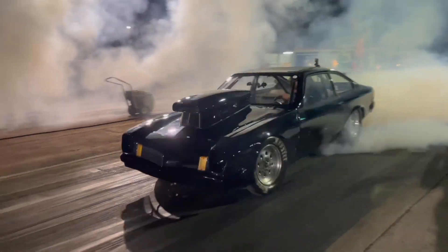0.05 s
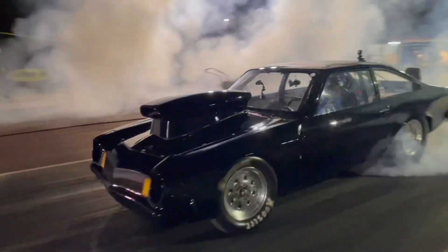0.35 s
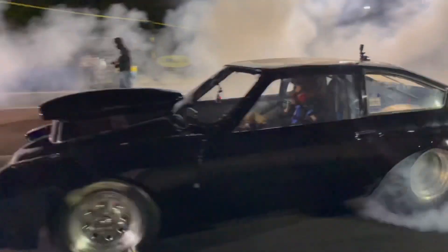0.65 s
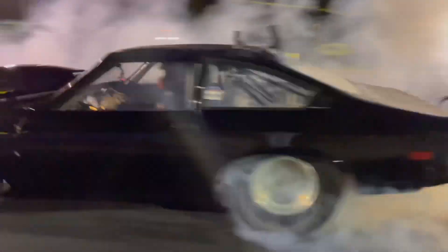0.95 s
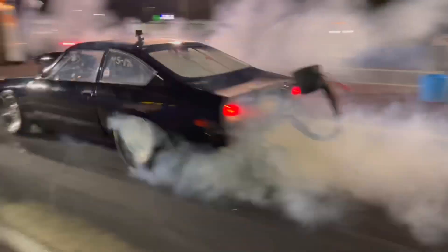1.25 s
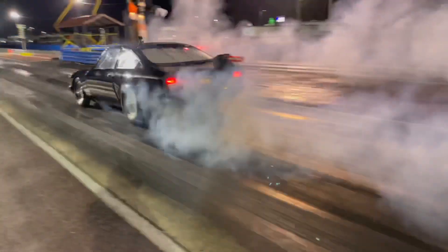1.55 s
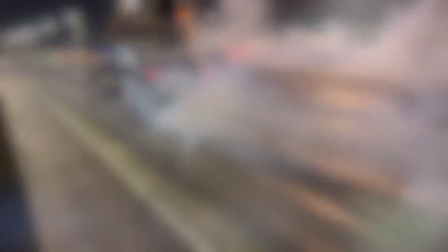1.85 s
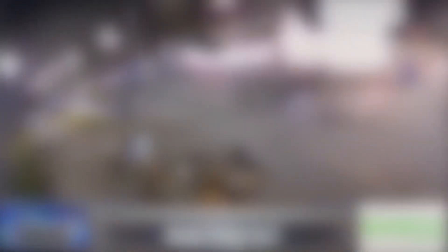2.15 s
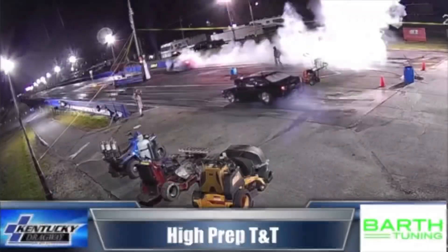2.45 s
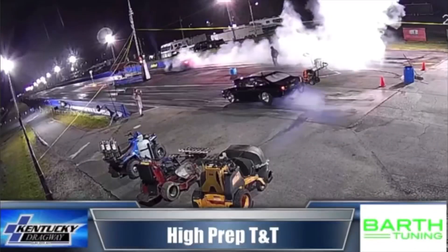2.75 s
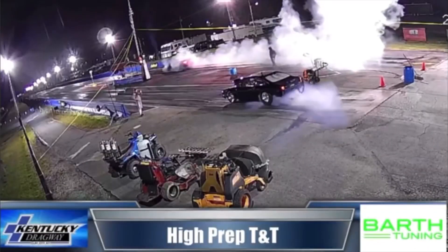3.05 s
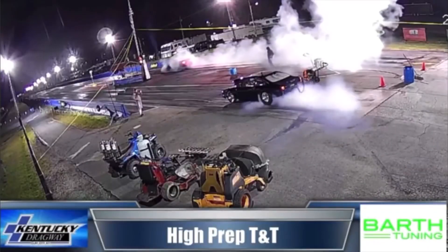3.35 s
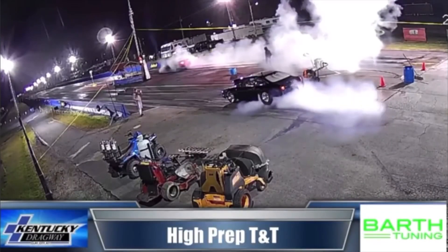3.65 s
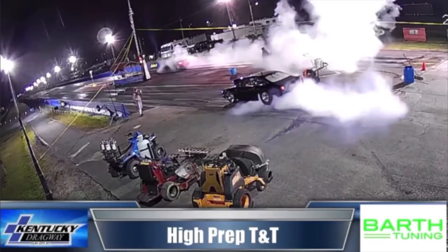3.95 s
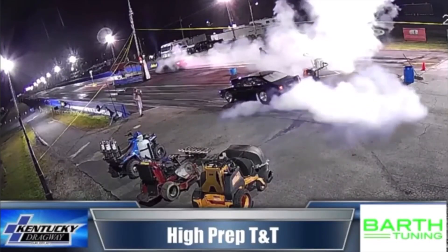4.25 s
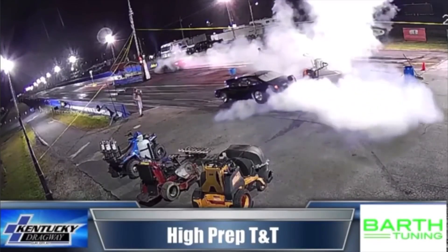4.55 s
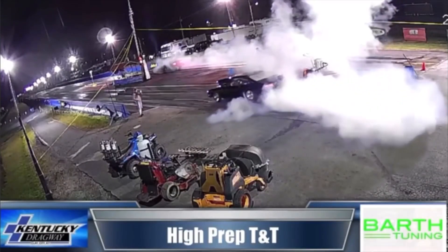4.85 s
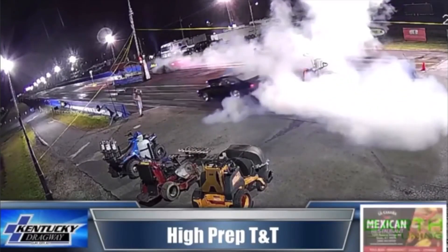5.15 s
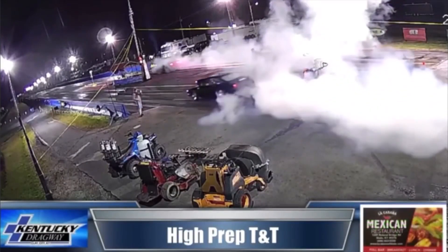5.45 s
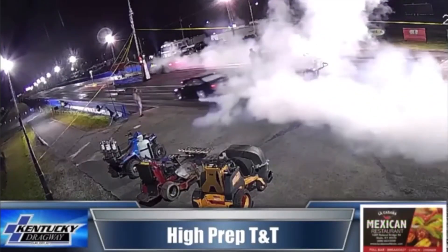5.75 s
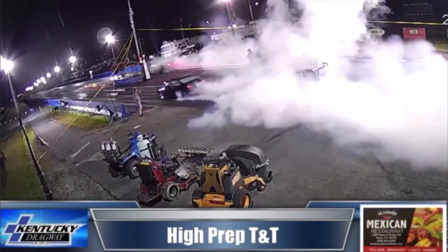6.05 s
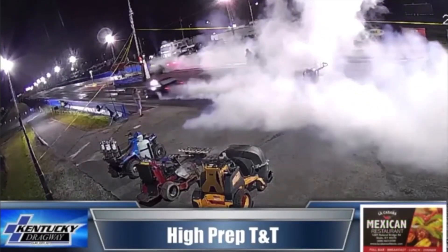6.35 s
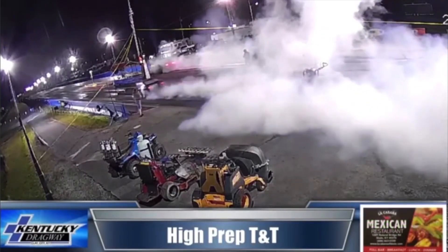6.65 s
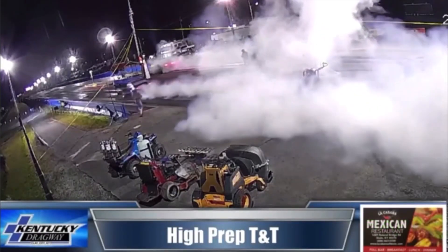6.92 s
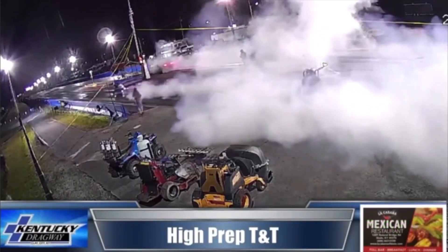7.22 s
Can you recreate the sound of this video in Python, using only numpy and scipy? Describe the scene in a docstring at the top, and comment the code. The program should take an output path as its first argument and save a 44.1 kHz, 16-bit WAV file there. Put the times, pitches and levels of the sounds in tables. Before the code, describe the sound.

A race car booms past close by with sizzling tyres, then a faraway engine holds high revs in a burnout before falling to idle.

```python
"""Trackside at a drag strip, a stereo microphone 1.6 m from the pipes: a V8 slides past in a burnout,
its firings booming and barking, tyres sizzling, exhaust gusts buffeting the microphone. The driver lifts
and the car burbles off to the left, popping unburnt fuel and flicking grit. Around two seconds in, the
sound fades over to a distant mono microphone above the strip. There a second burnout is held for four
seconds, until the throttle shuts and the engine drops to a lumpy, receding idle."""
import sys
import numpy as np
from scipy import signal
from scipy.fft import rfft, irfft, next_fast_len
from scipy.io import wavfile
from scipy.ndimage import uniform_filter1d, map_coordinates

SR = 44100
rng = np.random.default_rng(int(sys.argv[2]) if len(sys.argv) > 2 else 0)


def generate_wav(signal):
    """Clip the signal to [-1, 1] and save it as 16-bit WAV at the path in sys.argv[1]."""
    frames = np.transpose(np.atleast_2d(signal))
    scaled = np.clip(frames, -1, 1) * 32767
    pcm = np.round(scaled).astype(np.int16)
    wavfile.write(sys.argv[1], SR, pcm)


N = 321046
T = np.arange(N) / SR

# the eight firings as heard from the nearer bank of pipes, in firing order: level_db
FIRING_DB = [0.5, -9.5, -3.5, -2, -5.5, -2, -5.5, -7.5]
# spectrum of a sharp tick, for grit and after-fires: frequency_hz, level_db
TICK_SPECTRUM = [(1500, -9), (4900, -0.5), (6000, -6), (8200, -3), (9700, -12), (13500, 0.5)]

PIPE_HZ = 233.8  # the exhaust's main resonance
NEAR_LIFT_S, FAR_LIFT_S = .878, 5.925  # the driver lifts off the throttle
CAR_M_S, PIPES_S, PIPES_M = 5, .51, 1.6  # close car's speed; when its pipes are abreast, and how far off


def undb(db):
    """Decibels to gain."""
    return np.exp(np.asarray(db) * np.log(10) / 20)


def curves(table):
    """Each column of a table of rows (time_s, ..) at every sample."""
    times, *columns = np.transpose(table)
    return [np.interp(T, times, column) for column in columns]


def ramp(start_s, end_s):
    """Goes from 0 to 1 between two times."""
    return np.clip((T - start_s) / (end_s - start_s), 0, 1)


def fade(start_s, db_per_s):
    """Gain that falls evenly in dB from a given time."""
    return undb(-db_per_s * np.maximum(T - start_s, 0))


def swells(events, attack_s, decay_s):
    """Gain of events (start_s, level_db) that each rise quickly and die away."""
    return sum(undb(db) * ramp(s, s + attack_s) * np.exp(-np.maximum(T - s - attack_s, 0) / decay_s)
               for s, db in events)


def steady(x, size=4000):
    """Holds the short-term rms of the channel mean at 1."""
    power = uniform_filter1d(np.atleast_2d(x).mean(axis=0) ** 2, size=size)
    return x / np.sqrt(np.abs(power) + 1e-12)


def roughen(tones, noise, share):
    """Levels tones and noise, then mixes them with the noise taking a share 0-1 of the power."""
    return np.sqrt(1 - share) * steady(tones) + np.sqrt(share) * steady(noise)


def walk(rate_hz):
    """Random wander with a spread near 1."""
    knots = rng.standard_normal(int(rate_hz * N / SR) + 2)
    return np.interp(T * rate_hz, np.arange(len(knots)), knots) * np.sqrt(3 / 2)


def air(likeness):
    """Two channels of noise, alike by a share 0-1."""
    common = np.sqrt(likeness) * rng.standard_normal(N)
    return common + np.sqrt(1 - likeness) * rng.standard_normal((2, N))


def colour(x, points, size=4096):
    """Minimum-phase filter through (frequency_hz, level_db) points, falling steeply beyond them."""
    hz, db = np.transpose(points)
    log_hz = np.log(np.maximum(np.fft.rfftfreq(size, 1 / SR), 1))
    outside = np.maximum(np.log(hz[0]) - log_hz, 0) + np.maximum(log_hz - np.log(hz[-1]), 0)
    response_db = np.interp(log_hz, np.log(hz), db) - 27.7 * np.minimum(outside, 2)
    cepstrum = irfft(np.log(undb(response_db)))
    cepstrum[1:size // 2] *= 2
    cepstrum[size // 2:] = 0
    impulse = irfft(np.exp(rfft(cepstrum)))
    return signal.oaconvolve(np.atleast_2d(x), impulse[None], axes=1)[:, :N]


def ring(x, hz, width_hz):
    """One resonance, gain 1 at its centre."""
    return signal.lfilter(*signal.iirpeak(hz, hz / width_hz, fs=SR), x)


def passing(abreast_s, metres):
    """Inverse-distance gain of a part of the car, 1 when abreast of the microphone."""
    return metres / np.hypot(CAR_M_S * (T - abreast_s), metres)


def bearing():
    """Sine of the angle from the microphone to the pipes: -1 approaching, +1 leaving."""
    return CAR_M_S * (T - PIPES_S) / PIPES_M * passing(PIPES_S, PIPES_M)


def ports(x, lag_s):
    """Sound reaches the microphone's two ports apart in time, by the bearing of the car."""
    delays_s = np.array([[-1], [1]]) * lag_s * bearing() / 2
    return np.array([map_coordinates(channel, [(T - delay_s) * SR], mode="nearest")
                     for channel, delay_s in zip(x, delays_s)])


def shade(x):
    """The microphone's body shades the right port, more so once the car has gone left."""
    # balance facing the car, then with the car off to the left: frequency_hz, left_minus_right_db
    facing = [(100, 1), (300, -1), (600, -2), (1300, 3.5), (2500, -1.5), (4500, 3), (20000, -1)]
    gone_left = [(250, 1), (600, 4), (1300, 12.5), (2500, -4), (4500, 9), (20000, -4.5)]
    size = next_fast_len(N)
    log_hz = np.log(np.maximum(np.fft.rfftfreq(size, 1 / SR), 1))
    turned, shaded = ramp(.88, .98), 0
    for balance, share in ((facing, 1 - turned), (gone_left, turned)):
        hz, db = np.transpose(balance)
        tilt_db = np.interp(log_hz, np.log(hz), db)
        gains = undb(np.array([tilt_db, -tilt_db]) / 2)
        shaded += share * irfft(rfft(x, size) * gains, size)[:, :N]
    return shaded


def closing(lift_s):
    """The throttle, from 0 open to 1 shut in 42 ms."""
    return ramp(lift_s, lift_s + .042)


def overrun(lift_s, drop_db, db_per_s, coast_s=.22):
    """Gain after a lift: a step down as the throttle shuts, a short coast, then a fade."""
    return undb(drop_db * closing(lift_s)) * fade(lift_s + coast_s, db_per_s)


def revs(held_hz, lift_s, idle_hz=17, sag_hz_per_s=82):
    """Engine cycles per second: held until the driver lifts, then sinking evenly to idle."""
    return np.maximum(idle_hz, held_hz - sag_hz_per_s * np.maximum(T - lift_s, 0))


def crank(cycle_hz, flutter):
    """Engine cycles turned so far; the slipping tyres make the speed flutter."""
    return np.cumsum(cycle_hz * (1 + flutter * walk(30))) / SR


def firings(turns, scatter_db, jitter_s):
    """One pulse per firing, uneven in size and timing; unequal pipes give each cylinder its own delay."""
    count = len(FIRING_DB)
    k = np.arange(int(turns[-1] * count))
    late = rng.permutation(count) / count * .22  # share of the gap between firings
    chance = rng.standard_normal((len(k), 2))
    times_s = np.interp((k + late[k % count]) / count, turns, T) + jitter_s * chance[:, 0]
    size = undb(np.array(FIRING_DB)[k % count] + scatter_db * chance[:, 1])
    at = np.clip(times_s * SR, 0, N - 2)
    i = at.astype(int)  # each pulse is shared between two samples
    return np.bincount(i, size * (1 - at + i), N) + np.bincount(i + 1, size * (at - i), N)


def puffs(pulses, decay_s):
    """Each pulse opens a flow that dies away."""
    return signal.lfilter([1], [1, -np.exp(-1 / (decay_s * SR))], pulses)


def exhaust_lines(turns, views, turned, unrest, first_order, extra_db=None, extra_orders=0, apart=0):
    """Tones at multiples of the cycle rate, blended from view to view as the car turns its pipes."""
    mid, side, pattern = np.zeros(N), np.zeros(N), np.fft.fft(undb(FIRING_DB))
    orders = list(zip(*views)) + [[extra_db] * len(views)] * extra_orders
    for k, levels in enumerate(orders, first_order):
        # the firing order sets each phase; hot, moving air makes phase and level wander
        phase = np.angle(pattern[k % len(pattern)]) + unrest ** 2 * rng.standard_normal()
        drift = .5 * unrest * min(k / 10, 1) * walk(16)
        angle = 2 * np.pi * (k * turns % 1) + phase + drift
        waver_db = 2 * unrest * (walk(6) + walk(28))  # slow sway and quick flicker
        gain = undb(np.interp(turned, np.arange(len(views)), levels) + waver_db)
        mid += gain * np.sin(angle)
        if apart:  # short waves reach the two ports out of step
            side += gain * np.cos(angle) * apart * np.sqrt(k) * walk(5)
    return np.array([mid + side, mid - side]) if apart else mid


def strip():
    """Low rumble and hiss at the distant microphone above the strip."""
    # steady background: frequency_hz, level_db
    spectrum = [(25, 2), (85, -1.5), (380, -8), (2000, -20.5), (2680, -6.5), (3200, -19.5), (11300, -24),
                (12200, -47)]
    return steady(colour(rng.standard_normal(N), spectrum)) * undb(-66.5 + 1.1 * walk(4)) * ramp(1.7, 2.4)


def far_burnout():
    """From far off: low exhaust tones, a rasp in the microphone's resonance and crackle, then idle."""
    # engine speed with the throttle held: time_s, cycle_hz
    held_speed = [(2.0, 62), (2.19, 64.8), (2.41, 65.7), (3.25, 61.6), (3.48, 61.8), (4.14, 66),
                  (4.43, 64.9), (4.63, 62.3), (4.95, 61.1), (5.6, 60.7), (5.9, 61)]
    # loudness with the throttle held: time_s, exhaust_db, rasp_db
    held_levels = [(2.25, -47.5, -47), (3.44, -47, -45), (3.52, -45, -45.5), (4.6, -47, -45),
                   (4.92, -46.5, -47.5), (5.46, -44.5, -46.5), (5.88, -43.5, -43)]
    # exhaust tones from the front quarter, the flank and behind, orders 2-24: level_db
    quarter = [-19, -12.5, -11, -4.5, -15, -15, 0, -12, -10, -17, -4.5, -10, -26, 0, -5.5, -8, -2.5, -15,
               -20, -1.5, -6, -11, -8]
    flank = [-9, -12.5, -14, -2, -8, -10.5, 0.5, -14, -10, -4.5, -4.5, -9, -25, -2, -5.5, 1, -10, -8, -17,
             1, -1.5, -13, -11]
    behind = [-16.5, -25.5, -15.5, -9.5, -12, -13, -4, -11.5, -11.5, -21, -21, -3.5, -10, -31, -1.5, -21,
              -7, -16, -7.5, -0.5, 1, -1.5, -15]
    # rasping overtones from the same three sides, orders 36-46: level_db
    quarter_rasp = [-14, -6, -3, 1, -11, -4.5, -4, -2, -4, -8, -33]
    flank_rasp = [-6, 1, -3, -2, 0, -0.5, 1.5, -20, -6, -24, -12]
    behind_rasp = [-4.5, -9.5, -6, -11, -8, -6, 1.5, -2, -3, -12.5, -5]
    # turbulent exhaust, rasp and crackle at this distance: frequency_hz, level_db
    roar_spectrum = [(60, -19), (280, -8), (520, 0.5), (760, -0.5), (1050, 4), (1350, 5), (1600, -1.5),
                     (2100, -23.5)]
    rasp_spectrum = [(1200, -37.5), (1550, -15), (1780, -9), (2150, -6), (2420, 0.5), (2690, 5), (2950, -9),
                     (4000, -24)]
    crackle_spectrum = [(2500, -26), (3300, -3), (4500, 7), (6000, -6.5), (11000, -22)]
    # stronger burbles of the idle: start_s, exhaust_db, rasp_db
    idle_burbles = [(6.39, -63, -70), (6.615, -65.5, -70), (6.675, -64.5, -66), (6.895, -74, -60.5),
                    (7.035, -69, -66)]

    held_hz, = curves(held_speed)
    exhaust_db, rasp_db = curves(held_levels)
    turns = crank(revs(held_hz, FAR_LIFT_S), flutter=.001157)
    shut, idle = closing(FAR_LIFT_S), ramp(5.96, 6.7)
    # higher revs are rougher and the tones break up at the peak; a shut throttle is mostly turbulence
    rough = .06 + .014 * (held_hz - held_hz.min()) + .27 * np.exp(-((T - 4.25) / .07) ** 2)
    rough = np.clip(rough + (.8 - rough) * shut, 0, 1)
    pulses = firings(turns, scatter_db=2.5, jitter_s=.00002)
    flow = rng.standard_normal(N) * puffs(pulses, decay_s=.013)
    turned = ramp(3.5, 3.7) + ramp(4.46, 5.15)
    ragged = undb(1.2 * walk(90))  # no two engine cycles burn alike
    lines = ragged * exhaust_lines(turns, (quarter, flank, behind), turned, unrest=.9,
                                   first_order=2, extra_db=-10, extra_orders=11)
    exhaust = roughen(lines, colour(flow, roar_spectrum), rough)
    # with the throttle shut the falling orders sweep through the pipe resonance
    pipe_drive = steady(lines) + undb(-5) * steady(flow)
    exhaust += undb(-7) * (shut - idle) * steady(ring(ring(pipe_drive, PIPE_HZ, 149), PIPE_HZ, 151))
    exhaust += undb(-7.5) * idle * steady(ring(ring(pulses, 88, 68), 89, 70))  # single firings thump
    # the high orders waver most on their way through the air
    overtones = ragged * exhaust_lines(turns, (quarter_rasp, flank_rasp, behind_rasp), turned,
                                       unrest=1.1, first_order=36)
    rasp = roughen(ring(overtones, 2550, 600), colour(flow, rasp_spectrum), np.clip(rough + .22, 0, 1))

    # the idle lopes, burbles and recedes
    lope = idle * undb(2.4 * walk(16)) * fade(6.26, db_per_s=8)
    burp, buzz = (swells(np.array(idle_burbles)[:, [0, k]], attack_s=.016, decay_s=.038) for k in (1, 2))
    exhaust_gain = undb(exhaust_db) * overrun(FAR_LIFT_S, drop_db=-6.5, db_per_s=99.5)
    rasp_gain = undb(rasp_db) * overrun(FAR_LIFT_S, drop_db=-8.5, db_per_s=84.5)
    exhaust *= np.hypot(exhaust_gain, np.hypot(undb(-68) * lope, burp))
    rasp *= np.hypot(rasp_gain, np.hypot(undb(-66.5) * lope, buzz))
    # the crackle comes in surges and grows faster than the rasp as the engine works harder
    crackle_db = -61.5 + 2 * (rasp_db - rasp_db.max()) + walk(20)
    crackle = steady(colour(flow, crackle_spectrum)) * undb(crackle_db)
    crackle *= overrun(FAR_LIFT_S, drop_db=-9.5, db_per_s=54)
    return (exhaust + rasp + crackle) * ramp(1.765, 2.34)


def buffet():
    """The exhaust blast shakes the close microphone: a few gusts, then a dying wake."""
    # gusts that hit the microphone: start_s, level_db
    gusts = [(.225, -28.5), (.36, -23.5), (.51, -24), (.665, -33)]
    eddies = air(.33) * undb(2.8 * walk(25))
    blast = steady(colour(eddies, [(30, -24.5), (62, -2), (95, -1), (200, -12.5)]), size=2000)
    wake = undb(-46 + 10 * ramp(.21, .24)) * fade(.8, db_per_s=25)
    return blast * (wake + swells(gusts, attack_s=.008, decay_s=.033))


def grit():
    """Crumbs of rubber and stone tick with a bright ring; finer ones sprinkle on as the car leaves."""
    # larger pieces flung from the slicks: start_s, level_db
    hits = [(1.411, -43), (1.507, -44), (1.5809, -43.5), (1.7406, -45), (1.9007, -38.5), (2.056, -49)]
    crumbs_per_s, tick_ring_hz = 140, 4800
    crumbs = (rng.random(N) < crumbs_per_s / SR) * undb(2.4 * rng.standard_normal(N))
    crumbs *= ramp(1.65, 1.75) * fade(1.75, db_per_s=14)
    sprinkle = undb(-56) * puffs(crumbs, decay_s=.0048)
    contact = air(.21) * (swells(hits, attack_s=.001, decay_s=.006) + sprinkle)
    return colour(contact, TICK_SPECTRUM) + 1.1 * ring(contact, tick_ring_hz, 350)


def cracks():
    """Small after-fires at the pipe mouths: a short rush of gas with a hollow ring."""
    # after-fires: start_s, level_db
    after_fires = [(1.384, -41), (1.4671, -44), (1.6225, -40), (1.6963, -38), (1.829, -43), (1.8585, -42)]
    burst = air(.35) * swells(after_fires, attack_s=.001, decay_s=.0084)
    return 3 * ring(burst, hz=950, width_hz=380) + .65 * colour(burst, TICK_SPECTRUM)


def burble(turns):
    """Off throttle, ragged firings ring the pipe and thud; pops and a nudge of throttle lift them."""
    # gas leaving the pipes: frequency_hz, level_db
    gas_spectrum = [(200, -8.5), (480, 0), (1300, -13.5), (4600, -19), (15000, -39)]
    # unburnt fuel popping in the pipes: start_s, level_db
    fuel_pops = [(1.2, -32.5), (1.383, -38.5)]
    pulses = firings(turns, scatter_db=5, jitter_s=.00098)
    flow = air(.86) * puffs(pulses, decay_s=.0113)
    pipe = steady(ring(ring(flow, PIPE_HZ, 33), PIPE_HZ, 130), size=1500)
    thud = steady(colour(flow, [(35, -35), (58, 0), (85, 1), (130, -7.5), (180, -14.5)]), size=2500)
    gas = steady(colour(flow, gas_spectrum))
    nudge_s, peak_s = 1.573, 1.703  # a touch of throttle keeps the car rolling
    rolling, nudge = ramp(1.3, 1.39), ramp(nudge_s, peak_s) ** 2
    pops = swells(fuel_pops, attack_s=.0021, decay_s=.042)
    pipe *= undb(-52) * rolling + undb(-44) * nudge * fade(peak_s, db_per_s=50) + pops
    thud *= undb(-56.5) * rolling + undb(-46) * nudge * fade(peak_s, db_per_s=17)
    gas *= undb(-57) * rolling + undb(-47.5) * nudge * fade(peak_s, db_per_s=79) + undb(-6) * pops
    return pipe + thud + gas


def close_pass(turns, cycle_hz):
    """Open pipes boom and bark, gas and tyres sizzle; all swell in passing and sink after the lift."""
    # exhaust tones ahead of the car, at the pipes, at the rear wheel and past it, orders 2-24: level_db
    ahead = [-4, -1.5, -12, 0, -10, -25, -5, -9, -16, -6.5, -15, -6, -5.5, -9, -7.5, -22, -4, -5, -6.5, -8,
             -8.5, -15, -9.5]
    abreast = [-12, -4.5, -17, 0.5, -15.5, -14.5, -6.5, -10, -4.5, 0, -13, -6, -11.5, -16.5, -10.5, -12,
               -16, -7, -14.5, -9.5, -11, -15.5, -10]
    rear_wheel = [-16.5, -10.5, -14, 1.5, -11, -14.5, 3.5, -10.5, -8, -3.5, -8.5, -2, -4.5, -1, -10, -16,
                  -16.5, -11, -20.5, -11.5, -10.5, -15, -11]
    past = [-13.5, -11, -13.5, 1.5, -12, -30.5, -14, -20, -22, -6.5, -13.5, -10, -7, -10, -12.5, -23.5,
            -22.5, -11.5, -21, -11, -13, -14.5, -17]
    # turbulent exhaust from close by: frequency_hz, level_db
    roar_spectrum = [(50, -22.5), (130, -3.5), (240, -1.5), (380, -1), (620, -2), (1000, -4), (1300, -0.5),
                     (1750, -5), (2100, -18.5), (3600, -28.5)]
    # bright hiss and spray, with the peaks and notches the microphone and recorder add:
    # frequency_hz, level_db
    bright_hiss = [(1500, -13), (2300, 0), (3300, -1.5), (4800, -2), (5600, -9.5), (6600, 0), (7500, -11.5),
                   (8200, -9), (9800, -14), (13000, -7), (15500, -12)]
    bright_spray = [(1500, -5), (2300, -2), (3200, -4.5), (4900, 3), (5800, -5), (7300, -5), (8200, 0),
                    (9700, -12), (13500, -8), (15500, -11.5)]
    tyres_s, tyres_m = .64, 2.74  # when the rear tyres are abreast, and how far off

    shut = closing(NEAR_LIFT_S)
    pulses = firings(turns, scatter_db=2, jitter_s=.00008)
    turned = ramp(.26, .38) + ramp(.53, .6) + ramp(.66, .73)
    # the tones are steady ahead of the car and break up in its wake
    lines = exhaust_lines(turns, (ahead, abreast, rear_wheel, past), turned, first_order=2,
                          unrest=.55 + .6 * ramp(.3, .5), extra_db=-22, extra_orders=14, apart=.18)
    roar = colour(air(.55) * puffs(pulses, decay_s=.0016), roar_spectrum)
    lowpass = signal.butter(4, 400, fs=SR, output="sos")  # boom below 400 Hz, bark above
    low_lines, low_roar = signal.sosfiltfilt(lowpass, lines), signal.sosfiltfilt(lowpass, roar)

    # a few firings after the lift, the boom narrows to the pipe resonance
    spent = closing(NEAR_LIFT_S + .023)
    low_lines, low_roar = ((1 - spent) * x + spent * ring(x, PIPE_HZ, 59) for x in (low_lines, low_roar))
    # the falling fifth order swells in that resonance and stays clean until it has dropped through
    in_tune = np.exp(-((5 * cycle_hz - PIPE_HZ) / 24) ** 2)
    boom = roughen(low_lines, low_roar, np.clip(.062 + ramp(1.07, 1.095), 0, 1))
    # thrown backwards, the boom is stronger once the car is past; it dips as the rear wheel goes by
    dip_db = 4 * np.exp(-((T - tyres_s) / .14) ** 2)
    boom *= undb(-18.5 + 2 * bearing() + 10 * in_tune - dip_db)
    boom *= overrun(NEAR_LIFT_S, drop_db=-7, db_per_s=129)

    # the bark is more turbulent behind the car, and half turbulence with the throttle shut
    rough = .05 + .24 * ramp(.21, .88)
    bark = roughen(lines - low_lines, roar - low_roar, rough + (.5 - rough) * shut)
    # off throttle the falling orders sweep through the pipe's next two resonances
    overtones = sum(ring(bark, k * PIPE_HZ, 70) for k in (2, 3))
    bark = steady(bark + 2.1 * shut * overtones)
    bark *= undb(-17) * overrun(NEAR_LIFT_S, drop_db=-1.5, db_per_s=108.5)

    # the hiss of the pipes gives way to the spray of the rear tyres, which spin on a little longer
    spray, hiss = ramp(.55, .81), air(.11) * puffs(pulses, decay_s=.0058)
    sizzle = steady((1 - spray) * colour(hiss, bright_hiss) + spray * colour(hiss, bright_spray))
    sizzle *= undb(-25.5 - 4.66 * shut) * passing(tyres_s, tyres_m) * fade(1.147, db_per_s=160)
    return (boom + bark) * passing(PIPES_S, PIPES_M) + sizzle


def scene():
    """Trackside, the car passes with a slight Doppler fall; then the distant microphone takes over."""
    doppler = 1 - CAR_M_S * bearing() / 343
    cycle_hz = revs(held_hz=60.27, lift_s=NEAR_LIFT_S) * doppler
    turns = crank(cycle_hz, flutter=.003)
    car = close_pass(turns, cycle_hz) + burble(turns) + cracks() + grit()
    trackside = (ports(car, lag_s=.00011) + buffet()) * (1 - ramp(2.096, 2.56)) ** 2
    return shade(trackside) + far_burnout() + strip()


def record(dry):
    """The recorder cuts the treble steeply above 15.7 kHz."""
    return signal.sosfilt(signal.ellip(10, .2, 80, 15700, fs=SR, output="sos"), dry)


dry = scene()
out = record(dry)
generate_wav(out)
```